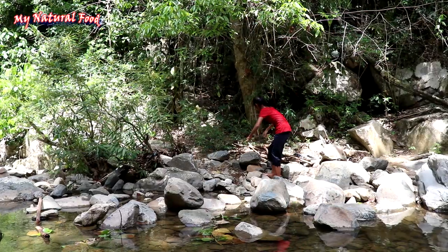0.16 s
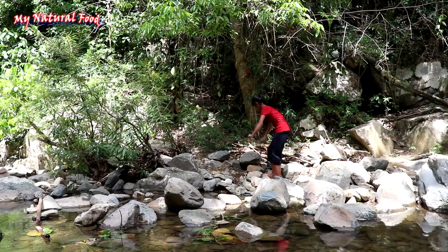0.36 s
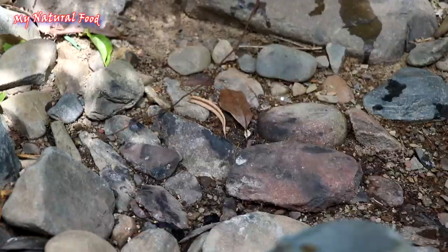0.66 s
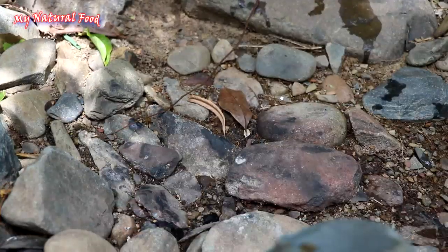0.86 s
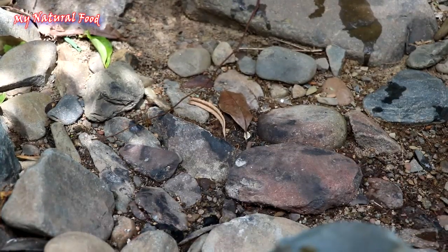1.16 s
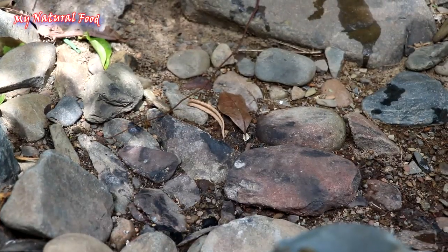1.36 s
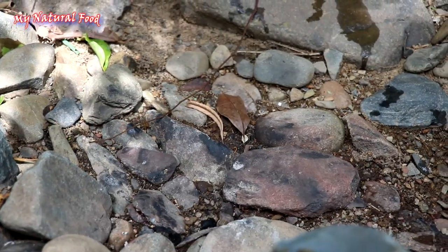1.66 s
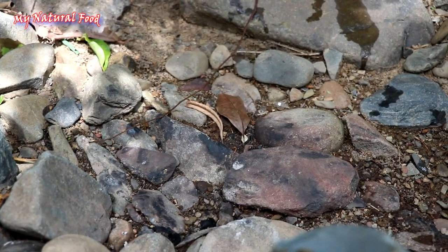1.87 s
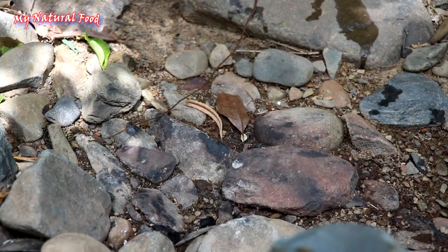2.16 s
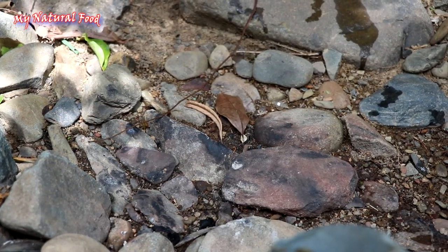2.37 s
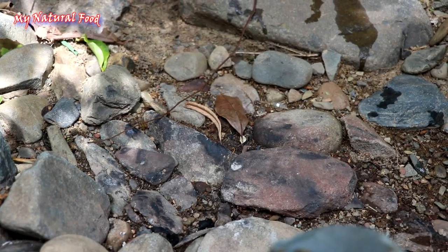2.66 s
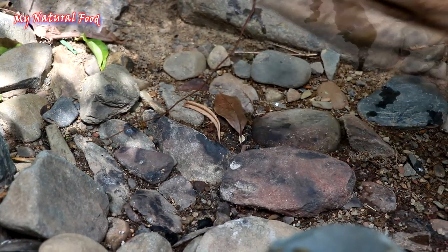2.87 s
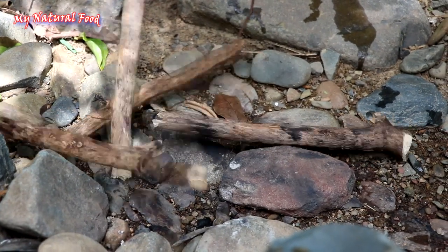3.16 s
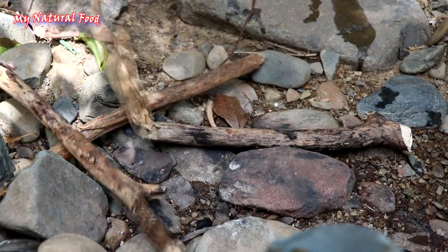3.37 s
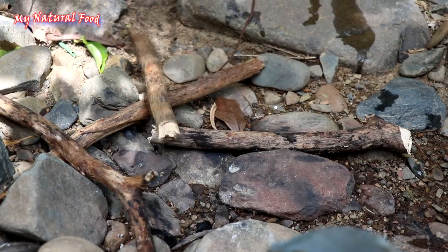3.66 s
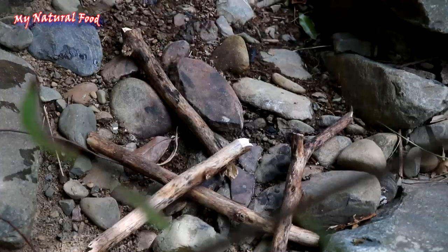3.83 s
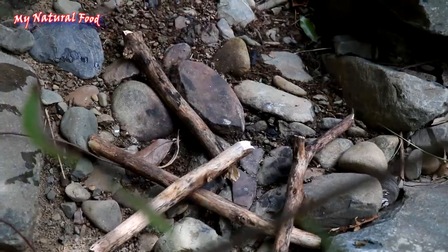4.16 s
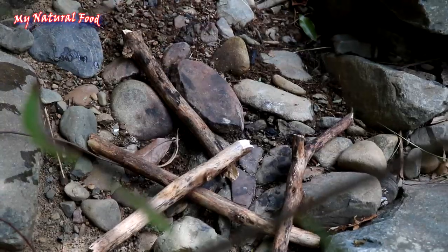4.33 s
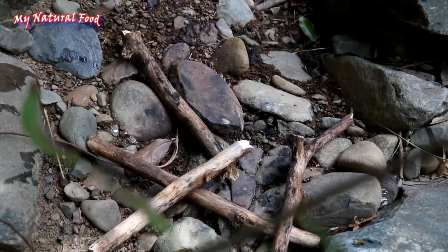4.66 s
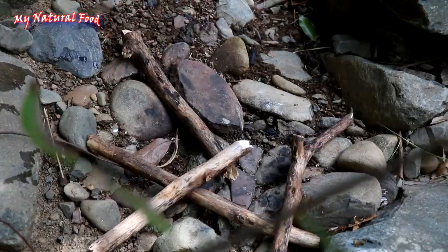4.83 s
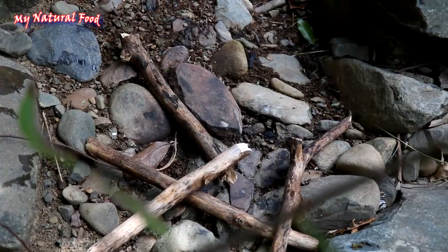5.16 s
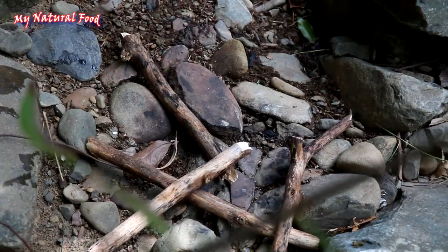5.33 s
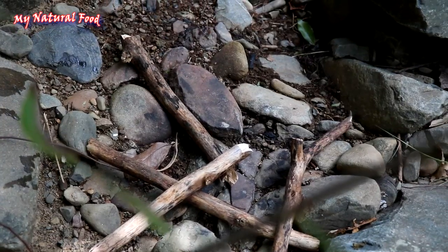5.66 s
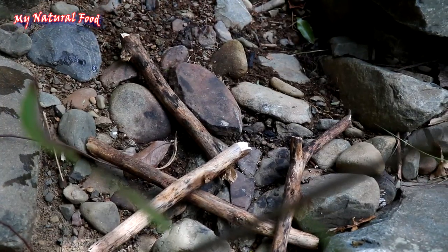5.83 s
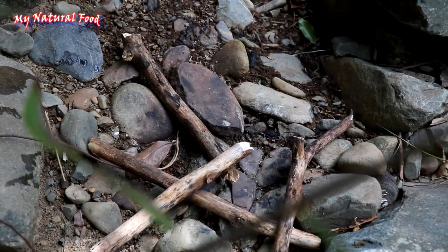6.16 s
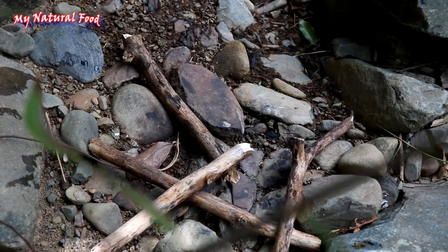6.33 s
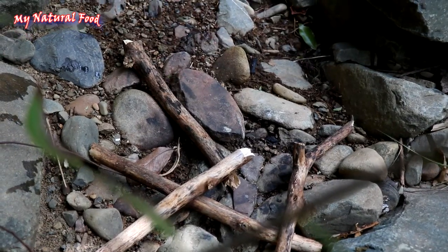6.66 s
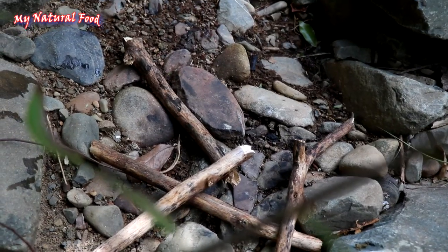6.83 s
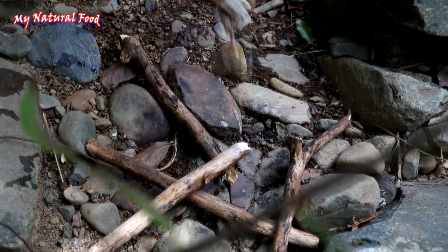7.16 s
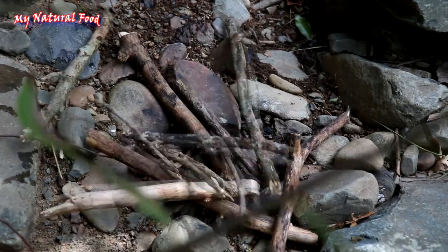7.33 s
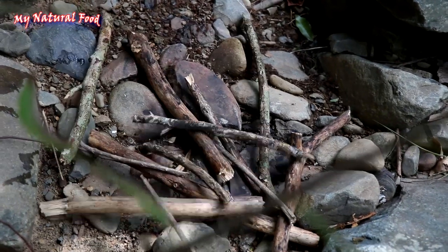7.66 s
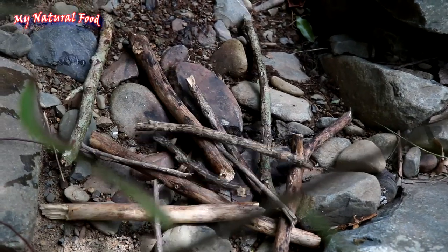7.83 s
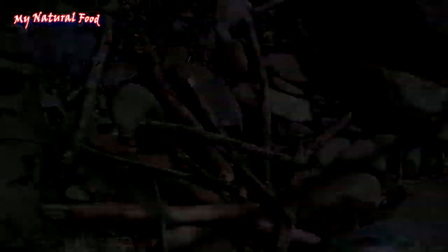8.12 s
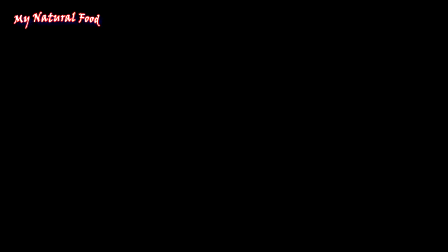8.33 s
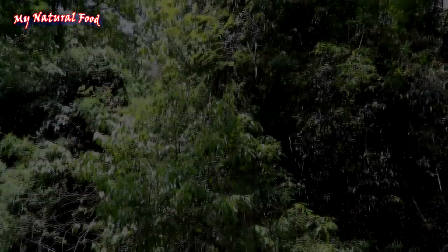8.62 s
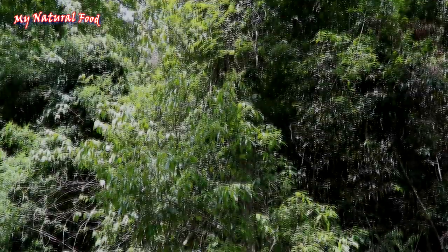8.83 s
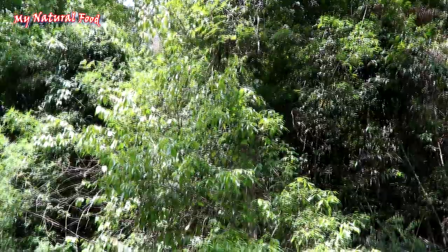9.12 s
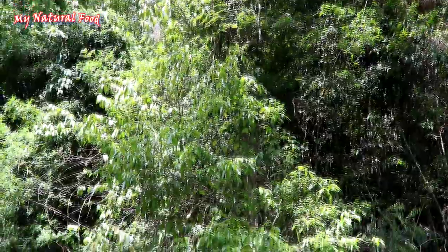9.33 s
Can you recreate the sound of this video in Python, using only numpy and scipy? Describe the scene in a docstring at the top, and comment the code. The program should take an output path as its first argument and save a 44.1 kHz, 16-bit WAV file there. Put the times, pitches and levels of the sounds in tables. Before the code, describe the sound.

A stream gurgles softly outdoors while dry wood is snapped close by, each crack echoing briefly off the bank. Several knocks lead to a loud tumble of sticks on rock. More scattered snaps come before another bundle clatters down and grinds into gravel. The water, with a faint wind rumble under it, then fades out and returns.

```python
"""A stream bank in a wood, the microphone close to dry sticks being snapped, knocked and dropped on stones.
Each blow is a burst of breaking fibres and the stick's short ring; rocks and trees echo the crack.
Behind are gurgling water, low wind on the microphone and, for the first half second, an insect.
The water is heard from four spots in turn; before the last, everything fades through silence."""
import sys
import numpy as np
from scipy import signal
from scipy.io import wavfile
from scipy.ndimage import uniform_filter1d

SR = 44100
rng = np.random.default_rng(int(sys.argv[2]) if len(sys.argv) > 2 else 0)


def pcm_store(signal):
    """Save signal as 16-bit PCM."""
    levels = np.round(np.clip(np.atleast_2d(signal), -1, 1) * 32767)
    wavfile.write(sys.argv[1], SR, levels.astype(np.int16).T)


N = 418509

# The water's colour at each spot. Each row: start in seconds, then points of (Hz, relative dB).
STREAM_SPOTS = [(0, [(25, -12), (200, -15), (280, -1), (400, -7.5), (1800, -7), (4400, -17.5),
                (5700, -23.5), (16000, -35.5)]), (.5, [(25, -15), (110, -19), (265, -2), (390, -10.5),
                (520, -7), (860, -8), (1100, -6), (1900, -4.5), (2300, -11.5), (4400, -13.5), (5400, -20.5),
                (16000, -35.5)]), (3.727, [(15, -44.5), (25, -7.5), (145, -18), (270, -2), (309, -11.5),
                (545, -2), (1740, -4.5), (2050, -10), (3430, -8.5), (6050, -21.5), (14800, -33.5),
                (16000, -30.5)]), (8.27, [(15, -28.5), (25, 2.5), (64, -19.5), (153, -19.5), (293, -6),
                (416, -13.5), (754, -9.5), (1160, -13.5), (1440, -12.5), (3340, -17), (5880, -27.5),
                (16000, -40.5)])]
SNAP_ECHO_DB, CLACK_ECHO_DB, LAST_DROP_ECHO_DB = -8, -8.5, .5  # how strongly the bank answers


def gain_of(db):
    """Decibels to amplitude."""
    return 10 ** (np.asarray(db) / 20)


def unit_rms(x):
    """Scales to unit rms."""
    return x / np.sqrt(np.mean(x ** 2) + 1e-20)


def at_hz(points, hz):
    """Reads a curve on a log-frequency axis."""
    f, value = np.transpose(points)
    return np.interp(np.log(hz + 1), np.log(f + 1), value)


def band(x, lo_hz, hi_hz, order=2):
    """Band-pass."""
    return signal.sosfilt(signal.butter(order, [lo_hz, hi_hz], "bandpass", fs=SR, output="sos"), x)


def add(mix, s, sound):
    """Adds a sound at s seconds."""
    part = mix[round(s * SR):][:len(sound)]
    part += sound[:len(part)]


def wind():
    """Wind on the microphone: a soft low rumble that swells and sinks."""
    # Each row: time in seconds, level in dB.
    swell = [(0, -69), (.4, -65), (2.8, -70.5), (8.6, -76), (9.49, -58.5)]
    level_db = np.interp(np.arange(N) / SR, *np.transpose(swell))
    return unit_rms(band(rng.standard_normal(N), 41, 74)) * gain_of(level_db)


def stream_gain():
    """The water is steady at each spot and dips briefly on reaching the second and third."""
    # The level at each spot in dB.
    spot_db = [-48, -47.5, -46.5, -48.5]
    # Each row: start in seconds, dip in dB.
    dips = [(0.501, -6.5), (3.725, -14)]
    recovery_s = .02
    t = np.arange(N) / SR
    spot = np.searchsorted([s for s, _ in STREAM_SPOTS], t, "right") - 1
    dip_db = sum(db * (t >= s) * np.exp(-abs(t - s) / recovery_s) for s, db in dips)
    return gain_of(np.take(spot_db, spot) + dip_db)


def stream():
    """Running water: noise gurgling in patches where bubbles cluster. Returns mid and side."""
    # Stereo width. Each row: frequency in Hz, side against mid in dB.
    width = [(30, -7.5), (250, -18), (1800, -51.5), (8000, -9.5), (15000, 0.5)]
    frames, hz = N // 256 + 5, np.fft.rfftfreq(1024, 1 / SR)
    mid_re, mid_im, side_re, side_im, patches = rng.standard_normal((frames, 513, 5)).T
    patches = uniform_filter1d(patches, size=8, axis=0)  # across frequency
    patches = unit_rms(uniform_filter1d(patches, size=5, axis=1))  # across time
    gurgle_db = at_hz([(200, 2.4), (1500, 2.46), (5000, 0.37)], hz)[:, None]  # most in the low voices
    side = gain_of(at_hz(width, hz))[:, None] * (side_re + 1j * side_im)
    spectra = np.array([mid_re + 1j * mid_im, side]) * gain_of(gurgle_db * patches)
    colours = np.array([unit_rms(gain_of(at_hz(colour, hz))) for _, colour in STREAM_SPOTS])
    spot = np.searchsorted([s for s, _ in STREAM_SPOTS], np.arange(frames) * 256 / SR, "right") - 1
    water = signal.istft(spectra * colours[spot].T, nperseg=1024, noverlap=768)[1][:, :N]
    return water / water[0].std() * stream_gain()


def insect():
    """Wings buzzing through one narrow resonance: a band of fast, unevenly throbbing noise."""
    # Each row: time in seconds, level in dB; the buzz stops at the last row.
    levels = [(0, -54), (.497, -57)]
    buzz_hz, width_hz = 5070, 190
    t = np.arange(SR) / SR
    throb = gain_of(2.2 * unit_rms(band(rng.standard_normal(SR), 17, 92)))
    buzz = band(throb * rng.standard_normal(SR), buzz_hz - width_hz / 2, buzz_hz + width_hz / 2, order=3)
    return unit_rms(buzz) * gain_of(np.interp(t, *np.transpose(levels), right=-120))


def bank_echo(cracks):
    """Diffuse echo off rocks and farther trees: noise that follows the cracks and dies band by band."""
    # The rocks. Each row: frequency in Hz, seconds to fall 60 dB.
    rock_decay = [(500, 0.15), (2000, 0.049), (7000, 0.13), (13000, 0.035)]
    trees_db, trees_slower = -6.5, 4.7  # the trees answer fainter and longer
    hz, t, spectra = signal.stft(cracks, SR, nperseg=128, noverlap=96)
    power = uniform_filter1d(abs(spectra) ** 2, size=3, axis=0)
    late = np.pad(power, ((0, 0), (6, 0)))[:, :len(t)]  # arrives 4 ms late

    def tail(t60):
        kept_per_frame = gain_of(-120 * t[1] / t60)
        return np.array([signal.lfilter([1 - k], [1, -k], p) for k, p in zip(kept_per_frame, late)])

    rock_t60 = at_hz(rock_decay, hz)
    echo_power = tail(rock_t60) + gain_of(trees_db) ** 2 * tail(trees_slower * rock_t60)
    scatter = np.exp(2j * np.pi * rng.random(spectra.T.shape).T)
    return signal.istft(np.sqrt(echo_power) * scatter, SR, nperseg=128, noverlap=96)[1][:N]


def ground_bumps():
    """Soft bumps in the ground: low tones that swell and die within a few cycles."""
    # Each row: start in seconds, level in dB, pitch in Hz, rise in seconds.
    bumps = [(.823, -30.5, 360, 0.0016), (.93, -40, 171, 0.0098), (.94, -44, 70.6, 0.018),
             (2.985, -39.5, 70, 0.012), (3.0, -35, 156, 0.01), (6.68, -50, 210, 0.022),
             (7.242, -33.5, 250, 0.003), (7.29, -43, 152, 0.0094), (7.525, -49, 121, 0.0074)]
    ground = np.zeros(N)
    for s, db, hz, rise_s in bumps:
        age = np.arange(SR // 4) / SR / max(rise_s, .002)  # a bump under 2 ms is slowed, so sounds lower
        swell = np.e * age * np.exp(-age)
        add(ground, s, gain_of(db) * swell * np.sin(2 * np.pi * hz * rise_s * age))
    return ground


def crunch():
    """Twigs grind into the gravel in dense uneven clicks. Returns the start in seconds and the sound."""
    # Each row: time in seconds, level in dB.
    levels = [(7.242, -39), (7.35, -49), (7.422, -38)]
    clicks_per_s = 3500
    s, db = np.transpose(levels)
    t = np.arange(s[0], s[-1], 1 / SR)
    grit = rng.standard_normal(len(t)) * gain_of(3.0 * rng.exponential(1, len(t)))
    grit *= rng.random(len(t)) < clicks_per_s / SR
    return s[0], unit_rms(band(grit, 830, 2100)) * gain_of(np.interp(t, s, db))


def fibre_crack(db, hz, thud_db, snap_db, length_s):
    """Breaking fibres: one noise burst heard as a pitched body, a bright snap and a low thud."""
    t = np.arange(SR // 4) / SR
    noise = rng.standard_normal(len(t)) * (1 - np.exp(-t / 0.0001))
    burst = noise * np.exp(-(t / length_s) ** 1.12)
    slow_burst = noise * np.exp(-(t / (1.3 * length_s)) ** 1.12)
    body = band(burst, min(0.58 * hz, 2650), 4010, order=3) + 1.82 * band(burst, hz * 0.83, hz * 1.14)
    layers = [(db, body), (snap_db, band(burst, 5800, 11000)), (thud_db, band(slow_burst, 400, 1650))]
    energy = 0.34 * length_s * SR  # brings each layer's peak near its level
    return sum(gain_of(level) * x * np.sqrt(energy / np.sum(x ** 2)) for level, x in layers)


def stick_ring(hz):
    """The damped modes of the stick whose leading mode lies nearest the blow's pitch."""
    # Each row is a stick, leading mode first. Each mode: pitch in Hz, relative dB, seconds to fall 60 dB.
    sticks = [
        [(761, -4.5, 0.17), (1900, -4, 0.12), (3440, -12, 0.046)],
        [(1115, 3, 0.11), (885, 2, 0.1), (460, -8, 0.56)],
        [(2184, -2.5, 0.066), (2790, -6, 0.07), (494.5, -14.5, 0.26)],
        [(1185, 1.5, 0.09), (2660, -2, 0.13), (3050, 9, 0.024)],
        [(1650, 6.5, 0.029), (2820, 3, 0.02), (4300, -16, 0.066)],
        [(2975, -1, 0.052), (1865, -1.5, 0.047)],
        [(2660, -5, 0.072)],
        [(3193, -1, 0.043)],
        [(3940, 3.5, 0.016)],
    ]
    t = np.arange(SR // 4) / SR
    stick = min(sticks, key=lambda modes: abs(np.log(modes[0][0] / hz)))
    mode_hz, mode_db, t60 = np.transpose(stick)[:, :, None]
    nearness_db = -3 * abs(np.log2(mode_hz / hz))  # far modes are struck more weakly
    modes = gain_of(mode_db + nearness_db - 60 * t / t60) * np.sin(2 * np.pi * mode_hz * t)
    return modes.sum(0) * (1 - np.exp(-t / 0.00052))


def bark_ticks():
    """Blows of bark and splinters: faint ticks, strongest in the treble."""
    # Each row: start in seconds, snap level in dB.
    ticks = [(1.57, -51), (4.223, -36), (4.683, -53), (5.336, -45), (5.37, -53), (5.412, -50), (5.495, -52),
             (5.557, -48), (5.585, -50), (5.612, -47), (6.301, -47.5), (6.91, -49), (7.961, -42)]
    hz, body_db, thud_db, length_s, ring_db = 1500, -4.5, -9, .004, -20
    for s, db in ticks:
        yield s, SNAP_ECHO_DB, db + body_db, hz, db + thud_db, db, length_s, ring_db


def stick_clacks():
    """Blows of wood on wood or stone, with more thud when an armful lands on the ground."""
    # Each row: start in seconds, level in dB, pitch in Hz, snap in dB against the level,
    # crack length in seconds, ring in dB against the level.
    clacks = [(1.056, -19, 1620, -32, 0.0061, -8), (1.478, -25, 1580, -34, 0.0047, -1),
              (1.532, -39.5, 960, -27, .005, -8), (2.539, -18.5, 1970, -24, 0.0041, -14),
              (2.54, -22, 2620, -27, 0.0067, 6.5), (2.556, -11, 1860, -40, 0.0021, -11.5),
              (2.56, -16, 1220, -35, 0.0029, -22), (2.583, -35, 2070, -25, .0045, -10),
              (2.647, -35, 930, -21, 0.0038, -12), (2.977, -32, 4300, 2, 0.0038, -15),
              (2.988, -8.5, 3840, -37, 0.0066, -14), (2.998, 1.5, 3070, -43, 0.0022, -5),
              (3.007, -8.5, 3102, -31, 0.0068, 2), (3.018, -16, 2670, -16, 0.0048, -17),
              (3.021, -5, 2350, -18.5, 0.0049, -13), (3.039, -23.5, 1710, -16, .0034, 6),
              (3.046, -31, 1120, -11.5, 0.0032, 5.5), (3.047, -23, 805, -43, 0.0053, 5.5),
              (3.1, -35, 888, 3, 0.0034, 5), (3.12, -24, 1440, -15, 0.011, -8),
              (3.125, -20, 2220, -36, 0.0029, 4.5), (3.178, -23.5, 2827, -20, 0.0071, 4),
              (3.19, -31, 1100, -7, 0.012, 6), (3.259, -29, 1930, -15, 0.004, -6),
              (3.266, -29, 1430, -24, 0.0044, -4), (3.279, -24, 1230, -19, 0.0052, -6),
              (3.306, -12, 1260, -13.5, 0.0019, -5.5), (3.322, -24.5, 1250, -28, 0.0044, -4.5),
              (3.432, -34, 3088, -11, 0.0038, 1), (3.534, -41.5, 918, -16, .005, 1.5),
              (3.922, -31.5, 1870, -12, 0.0076, -14), (4.349, -38.5, 1120, -10, .0053, -14),
              (4.615, -37.5, 1530, -8, .004, -7), (4.627, -40, 899, -0.5, .0053, -15),
              (4.909, -32.5, 4080, 3, .0037, -15), (4.987, -41, 924, -19, .004, -1),
              (4.996, -26, 556, -21, 0.0039, -14), (6.469, -28, 4020, -8, .003, -15),
              (6.481, -31, 870, -12, 0.0058, -14), (7.242, -33, 2220, -1, 0.0031, 4),
              (7.25, -25.5, 2000, -26.5, 0.0043, 1), (7.27, -22.5, 3900, -4.5, .0053, 0),
              (7.274, -16.5, 1240, -28, .002, -11.5), (7.289, -26.5, 1500, -1, 0.0038, -16),
              (7.299, -23, 1380, -17.5, 0.0038, -11), (7.303, -25, 2230, -22, 0.0021, 3),
              (7.321, -19.5, 3420, -5, .0032, -11), (7.328, -29, 2150, -2, 0.0037, -16),
              (7.334, -21.5, 2030, -19, 0.0019, -4), (7.313, -28, 2630, -1, 0.0029, -1),
              (7.348, -32, 3030, -1, .0033, -8), (7.394, -32.5, 2060, -13, 0.0054, 4),
              (7.431, -32, 2670, -20, .0063, 7), (7.455, -40.5, 660, -6.5, 0.006, -3),
              (7.482, -32, 2560, -11, 0.0034, 5), (7.526, -31.5, 3240, -9, 0.0016, 1),
              (7.751, -42.5, 900, -25, 0.0035, -10), (7.82, -43, 3430, -6, 0.003, 7),
              (7.844, -41.5, 1390, -13, 0.0028, -8), (8.051, -35, 800, -27, 0.0031, -3),
              (8.556, -38, 860, -20, 0.0034, -11.5), (8.629, -34.5, 2900, -27, 0.0047, -3.5)]
    # An armful lands and settles. Each row: start and end in seconds.
    drops = [(2.97, 3.6), (7.2, 8.1)]
    held_thud_db, drop_thud_db, at_level_db = -36, -26.5, -25.5
    for s, db, hz, snap_db, length_s, ring_db in clacks:
        thud_db = drop_thud_db if any(start < s < end for start, end in drops) else held_thud_db
        thud_db += 0.65 * (db - at_level_db)  # louder clacks thud more
        echo_db = LAST_DROP_ECHO_DB if s > drops[-1][0] else CLACK_ECHO_DB
        yield s, echo_db, db, hz, thud_db, db + snap_db, length_s, ring_db


def stick_snaps():
    """Two blows as a stick breaks: the crack, then the last fibres tearing with little thud or snap."""
    # Each row: start in seconds, level in dB, pitch in Hz, thud in dB, snap in dB, crack length in
    # seconds, ring in dB against the level, tear level in dB, tear pitch in Hz.
    breaks = [(.557, -8, 3560, -16, -11, 0.0062, -10.5, -4, 5530),
              (2.112, -2, 2038, -22.5, -6.5, 0.0046, -22.5, 1, 3910),
              (4.246, -14.5, 4040, -26.5, -10, 0.0044, -28, -7, 3800),
              (4.921, -19.5, 3940, -24.5, -11, 0.0047, -15, -14, 3160),
              (6.451, -11.5, 3500, -33, -15.5, 0.004, -32.5, -18, 1730)]
    tear_after_s, tear_length_s, tear_ring_db = 0.001508, 0.0031, -15
    for s, *first_crack, tear_db, tear_hz in breaks:
        yield s, SNAP_ECHO_DB, *first_crack
        weak_db = tear_db - 33
        yield s + tear_after_s, SNAP_ECHO_DB, tear_db, tear_hz, weak_db, weak_db, tear_length_s, tear_ring_db


def fade():
    """Gain of the fade to silence and back."""
    out_s, in_s, turn_s = 0.43, 0.53, 8.287  # both ramps aim at zero at the turn
    silent_from_s, silent_to_s = 8.246, 8.293
    t = np.arange(N) / SR
    falling, rising = np.clip([(turn_s - t) / out_s, (t - turn_s) / in_s], 0, 1)
    return falling ** .7 * (t < silent_from_s) + rising ** .88 * (t > silent_to_s)


def scene():
    """Everything sits in the centre; only the stream has width."""
    to_bank, mid = np.zeros((2, N))
    blows = [*stick_snaps(), *stick_clacks(), *bark_ticks()]
    for s, echo_db, db, hz, thud_db, snap_db, length_s, ring_db in blows:
        crack = fibre_crack(db, hz, thud_db, snap_db, length_s)
        add(to_bank, s, gain_of(echo_db) * crack)
        add(mid, s, crack + gain_of(db + ring_db) * stick_ring(hz))
    s, grit = crunch()
    add(to_bank, s, gain_of(LAST_DROP_ECHO_DB) * grit)
    add(mid, s, grit)
    add(mid, 0, insect())
    water, side = stream()
    mid += ground_bumps() + bank_echo(to_bank) + water + wind()
    return np.array([mid + side, mid - side]) * fade()


def record(dry):
    """The loudest cracks clip at full scale, and the treble ends at 16.2 kHz."""
    low_pass = signal.firwin(511, 16200, window=("kaiser", 9), fs=SR)[None]
    return signal.oaconvolve(np.clip(dry, -1, 1), low_pass, "same")


dry = scene()
out = record(dry)
pcm_store(out)
```